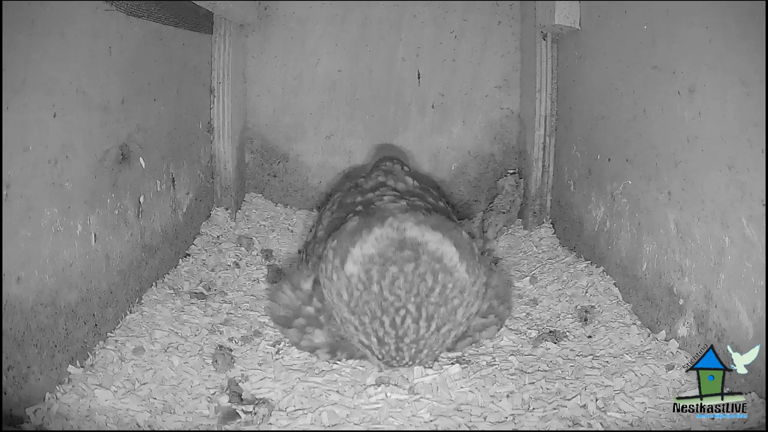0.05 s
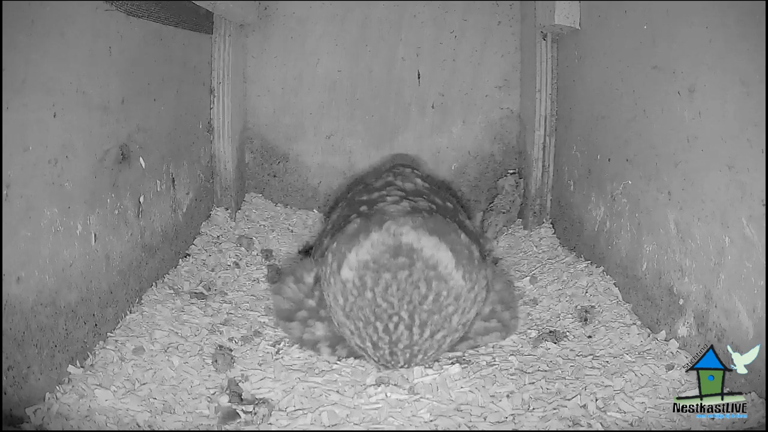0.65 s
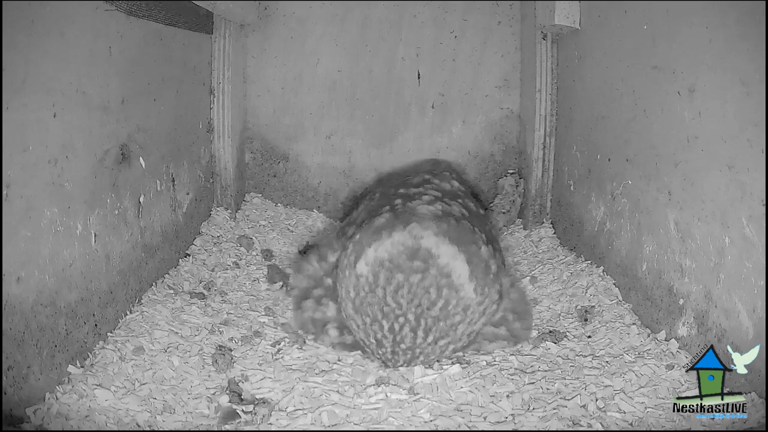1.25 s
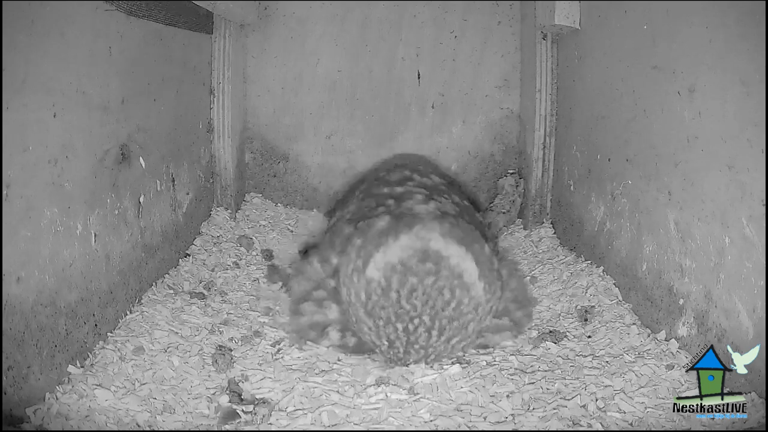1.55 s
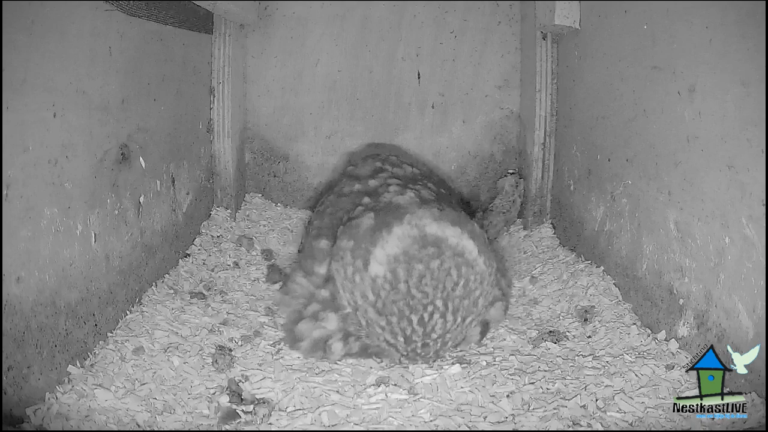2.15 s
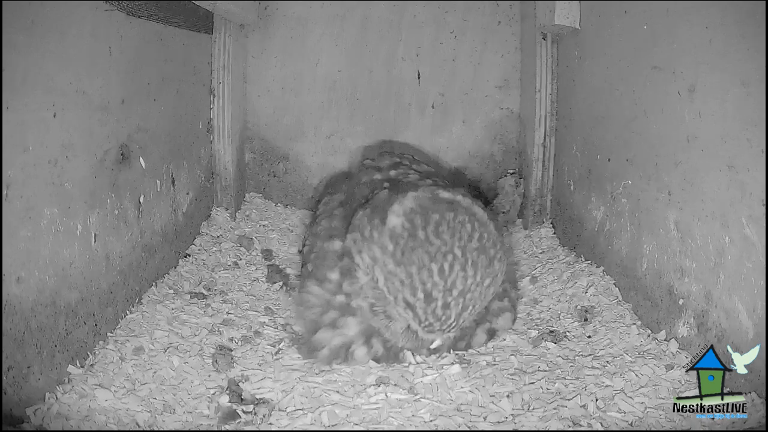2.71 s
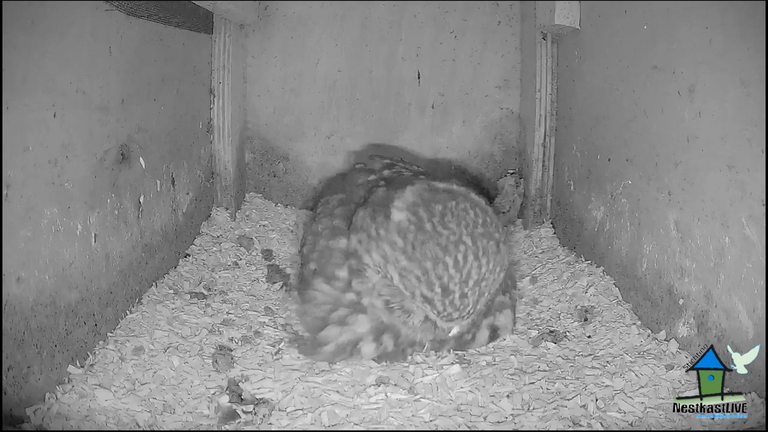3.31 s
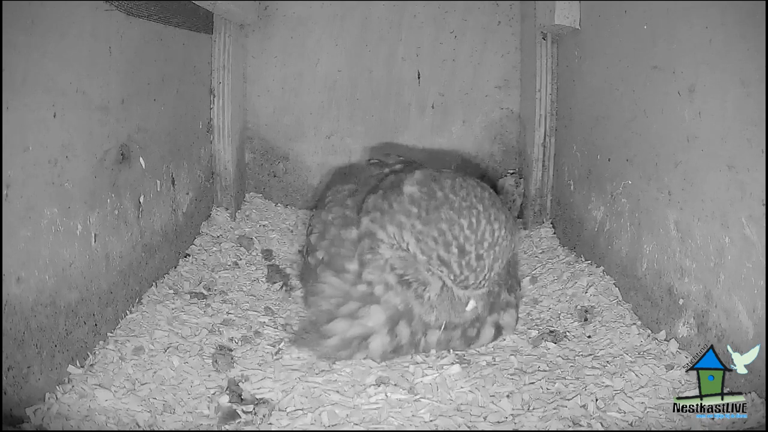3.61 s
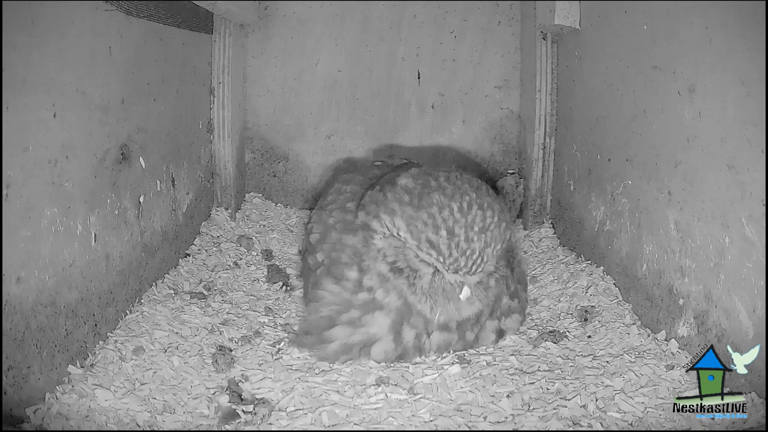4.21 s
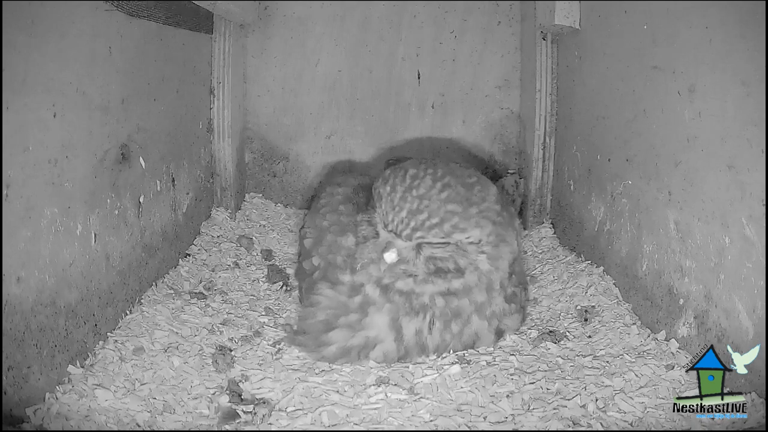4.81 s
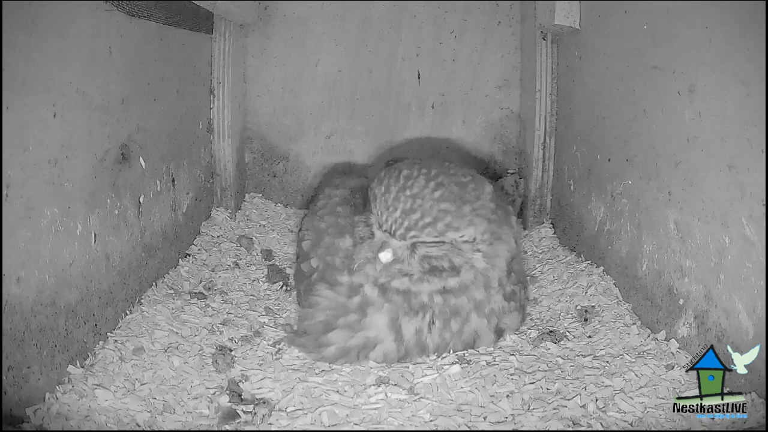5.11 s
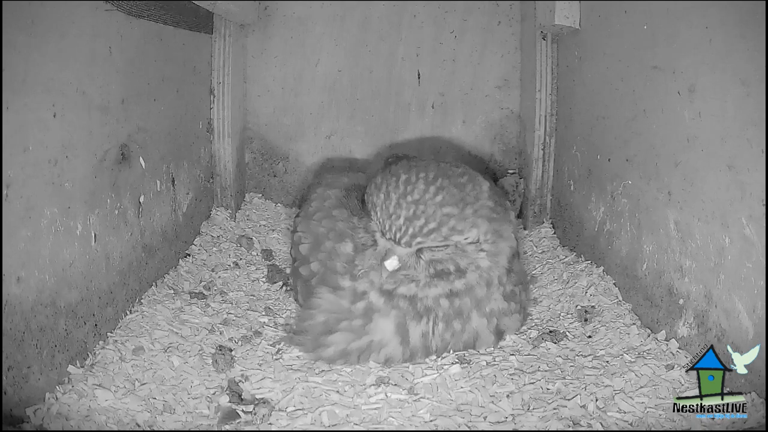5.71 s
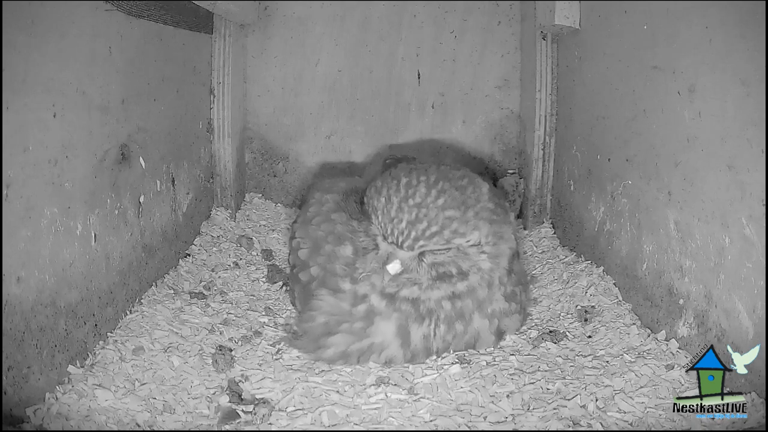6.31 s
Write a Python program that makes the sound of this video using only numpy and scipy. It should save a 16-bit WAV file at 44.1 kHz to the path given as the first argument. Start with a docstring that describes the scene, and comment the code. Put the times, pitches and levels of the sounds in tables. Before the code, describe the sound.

A deep, gently throbbing rumble fills a small wooden nest box throughout, with a thin hiss and the faint drone of far traffic. From the start until about 3 seconds, a small owl shuffles on wood shavings close to the microphone, in short bursts of dry rustling dotted with small snaps of chips under its claws. Soft, hollow footfalls ring the box, the strongest at about 1.4 seconds, with others near 1.7, 2.1 and 2.6. From about 3.3 seconds the owl preens quietly, with a few brief feathery scratches and ticks, a light knock near 3.7, and more faint strokes around 5.5. Small songbirds whistle faintly outside from about 3 seconds, thin sliding notes with a slight echo from the trees. They chirp more often between 4.4 and 5.2, give a quick trill from 5.3 to 5.8, and end with two longer notes near 6 seconds.

```python
"""You hear rustling, small snaps and soft thuds: a little owl shuffles on wood shavings in a wooden nest box,
pecks, then tucks its head in and preens. Slipping chips, claw snaps, footfalls and beak pecks all make the same
box ring. A low rumble fills it throughout, with a thin hiss and the drone of far traffic. In the second half,
small songbirds whistle faintly outside, echoed by the trees."""
import sys
import numpy as np
from scipy import signal
from scipy.fft import rfft, irfft
from scipy.io import wavfile
from scipy.ndimage import uniform_filter1d

SR = 44100
rng = np.random.default_rng(int(sys.argv[2]) if len(sys.argv) > 2 else 0)


def unload_audio(sound):
    """Save the sound as a 16-bit wav file, at the path given as the first command line argument."""
    columns = np.transpose(np.atleast_2d(sound))
    # keep every value between -1 and 1, then stretch to whole-number steps
    steps = np.round(np.clip(columns, -1, 1) * 32767)
    wavfile.write(sys.argv[1], SR, steps.astype(np.int16))


N = 280035
T = np.arange(N) / SR
HZ = np.arange(N // 2 + 1) * SR / N

# How strong the rumble and the hiss are from low to high: pitch_hz, relative_db
RUMBLE_SHAPE = [(15, 3), (30, -3.5), (50, -1.5), (80, 1), (100, -5.5), (122, -19.5), (160, -26),
                (215, -34.5), (300, -39.5), (360, -35.5), (435, -26), (490, -42), (900, -69.5)]
HISS_SHAPE = [(300, -25.5), (500, -3.5), (750, 4.5), (950, 0), (1250, 4.5), (1900, -7), (3100, -8.5),
              (4500, -12.5), (5900, -3.5), (6600, -16.5), (7400, -46.5)]
# The slow swell of the rumble: time_s, level_db
RUMBLE_SWELL = [(0, -39.5), (0.8, -38), (1.05, -43), (1.65, -36), (2.35, -40.5), (2.7, -38), (3.4, -41.5),
                (4.4, -38.5), (4.85, -38), (5.4, -40), (5.75, -38), (6.35, -43)]
# Tones that traffic rings in the box (wider ones die sooner): pitch_hz, width_hz, relative_db
TRAFFIC_TONES = [(270, 34, -1.5), (295.4, 21, 3.5), (333.3, 33, 1.5), (380, 60, 1), (444, 54, -8),
                 (695, 21, -27.5), (900, 13, -30.5)]
# Far vehicles passing: nearest_s, half_power_s (its sign does not matter), level_db
VEHICLES = [(0.101, -0.5, -61.5), (2.25, 0.32, -59.5), (5.02, 0.17, -56.5)]
# Single songbird notes: start_s, length_s, start_hz, end_hz, level_db, rasp (a share of the pitch)
BIRD_NOTES = [(3.113, 0.038, 7050, 7000, -81, 0.017), (3.17, 0.017, 5720, 5750, -62.5, 0.02),
              (3.237, 0.12, 6900, 7000, -82, 0.038), (3.365, 0.046, 5900, 5640, -71, 0.017),
              (3.443, 0.027, 5000, 4400, -73, 0.039), (3.519, 0.02, 4480, 4950, -68.5, 0.031),
              (4.353, 0.033, 3840, 3620, -71.5, 0.0094), (4.378, 0.025, 3485, 3220, -65.5, 0.018),
              (4.4, 0.023, 3240, 3080, -67, .02), (4.425, 0.028, 4440, 4200, -77, 0.017),
              (4.474, 0.042, 2690, 2270, -74.5, 0.032), (4.554, 0.055, 2420, 2380, -77.5, 0.035),
              (4.75, 0.033, 3480, 2810, -68.5, 0.034), (4.784, 0.016, 2440, 2370, -73, .02),
              (4.807, 0.04, 2710, 2200, -78, 0.052), (4.863, 0.032, 2430, 2280, -76, .02),
              (5.077, 0.014, 3510, 3200, -66.5, 0.02), (5.19, 0.023, 3650, 3470, -73.5, 0.016),
              (5.21, 0.021, 4260, 4400, -68, 0.023), (5.858, 0.12, 5000, 3890, -76, 0.047),
              (5.936, 0.12, 3470, 3390, -69, 0.021)]
# The two notes a trill repeats: delay_s, length_s, start_hz, end_hz, level_db, rasp
TRILL_NOTES = [(0, 0.022, 3500, 3340, -70, 0.037), (0.026, 0.027, 4290, 5040, -74, 0.063)]
# Tones of the box and the air in it: pitch_hz, width_hz, relative_db
BOX_TONES = [(139, 26, 4), (196, 36, 3.5), (309.4, 24, 6.5), (341.6, 38, -2), (440.6, 18, 4.5),
             (540, 67, -9.5), (708.3, 69.4, -2.5), (851.4, 39, -1.5), (1159, 49, -8.5), (1411, 70, -12),
             (1580, 130, -17.5), (1819, 98, -17.5), (2355, 240, -23), (2550, 95, -16.5), (2715, 190, -17.5),
             (3030, 91, -21.5), (3414, 240, -19.5), (3900, 170, -20.5), (4650, 240, -23.5),
             (5000, 340, -21), (5640, 170, -22), (6000, 170, -23), (6950, 83, -25)]
# Tones of the floor bending under the owl: pitch_hz, width_hz, relative_db
FLOOR_TONES = [(82, 29, 0.5), (132, 64, -14.5)]
# Thuds on the floor: the owl's weight landing, and at about 2.77, 2.83 and 3.67 s its beak pecking: start_s,
# peak_db, push_s
FLOOR_THUDS = [(1.371, -30, 0.0035), (1.397, -41, 0.0029), (1.717, -39, 0.0048), (2.053, -43, 0.0069),
               (2.587, -39.5, 0.0014), (2.771, -52, 0.00052), (2.826, -63.5, 0.003), (3.672, -43, 0.00096)]
# The owl shoves its body into the shavings: start_s, length_s, effort_db, claw_drag_db (added to effort)
BODY_SHOVES = [(0.038, 0.41, -60.5, -1), (0.547, 0.32, -61.5, 4.5), (0.984, 0.087, -62, 6.5),
               (1.156, 0.025, -62, 5.5), (1.276, 0.013, -62, 1), (1.366, 0.077, -61.5, 2.5),
               (1.51, 0.31, -60.5, 1.5), (1.88, 0.061, -58.5, 0.5), (2.022, 0.028, -59, 5.5),
               (2.138, 0.11, -60, 3), (2.402, 0.036, -68.5, 3), (2.734, 0.024, -64, -5),
               (2.998, 0.058, -72, 6)]
# The beak combs through the feathers: start_s, length_s, effort_db
BEAK_STROKES = [(3.352, 0.073, -69.5), (3.578, 0.018, -72.5), (3.888, 0.012, -69.5), (5.395, 0.0092, -68),
                (5.474, 0.023, -78), (5.568, 0.025, -86), (5.662, 0.012, -83)]
# The loudest chips giving way under claws and beak: time_s, knock_db, snap_db, pitch_hz, crush_s
CHIP_SNAPS = [(0.051, -50.5, -52.5, 1690, 0.0049), (0.061, -50, -55, 1490, 0.0025),
              (0.12, -58, -65, 2100, 0.0022), (0.136, -64, -54.5, 1460, 0.0056),
              (0.15, -52.5, -64, 1700, 0.0031), (0.194, -56, -58, 1880, 0.013),
              (0.231, -57, -69, 2200, 0.0029), (0.329, -50, -59.5, 2580, 0.0038),
              (0.358, -52, -57, 1450, 0.012), (0.398, -55, -59.5, 2470, 0.0034),
              (0.427, -61.5, -53, 2950, 0.0037), (0.558, -54, -61, 1440, 0.0046),
              (0.579, -53, -55.5, 2530, 0.0035), (0.601, -54.5, -59, 2710, 0.0024),
              (0.626, -66, -53, 1520, 0.0053), (0.661, -58, -60, 2300, 0.0072),
              (0.723, -67, -66.5, 6350, 0.0032), (0.756, -61, -65, 1800, 0.0044),
              (0.774, -50, -55.5, 2570, 0.006), (0.79, -52, -64, 2420, 0.0031),
              (0.814, -54, -49, 1730, 0.0044), (0.831, -55, -66, 1890, 0.0021),
              (0.853, -59, -64, 2600, 0.0033), (0.871, -60, -68, 6300, 0.003),
              (0.874, -52, -62, 2330, 0.0029), (0.948, -63.5, -61.5, 2130, 0.0072),
              (1.067, -54, -57, 2600, 0.0053), (1.079, -54, -59, 3550, 0.0069),
              (1.089, -51, -54, 1700, 0.0035), (1.141, -58, -58.5, 1670, 0.0013),
              (1.17, -65, -65.5, 2970, 0.0048), (1.291, -58, -63, 2370, 0.0083),
              (1.375, -48.5, -55.5, 2520, 0.0055), (1.383, -50, -70, 1800, 0.0047),
              (1.413, -48.5, -58, 3360, 0.0062), (1.431, -52.5, -57.5, 1610, 0.0028),
              (1.459, -74, -65.5, 6200, 0.0024), (1.483, -69, -61.5, 2860, 0.0025),
              (1.51, -57, -61.5, 2200, 0.0021), (1.539, -50.5, -57.5, 1890, 0.0033),
              (1.569, -49, -60, 2700, 0.005), (1.628, -61, -59.5, 2500, .004),
              (1.718, -54, -55, 2720, .003), (1.91, -62, -57.5, 2900, 0.01),
              (1.972, -46, -57, 2630, 0.0049), (2.048, -43.5, -51.5, 3380, 0.0077),
              (2.124, -60, -62, 3300, 0.0027), (2.242, -57, -59, 2900, 0.014),
              (2.406, -50, -56, 3200, 0.0013), (2.429, -58, -54, 2730, 0.0052),
              (2.529, -65, -61.5, 2600, 0.002), (2.539, -67, -50.5, 3900, 0.0024),
              (2.583, -42.5, -43.5, 2750, 0.0018), (2.73, -62, -61.5, 2800, 0.003),
              (2.767, -44.5, -55.5, 2830, 0.0048), (2.785, -59, -64, 2720, 0.0038),
              (2.824, -49, -61, 2740, 0.0036), (3.004, -58, -69, 1930, 0.003),
              (3.216, -70, -69.5, 2370, 0.003), (3.602, -57.5, -58, 2700, 0.003),
              (3.612, -68, -67, 2720, 0.002), (3.661, -73, -68, 2730, 0.0024),
              (3.674, -45.5, -56.5, 2770, 0.0045), (3.884, -60.5, -63, 2500, 0.0019),
              (3.896, -70, -57, 2600, 0.0023)]


def undb(db):
    """Turn decibels into a number to multiply by."""
    return 10 ** (np.asarray(db) / 20)


def unit(x):
    """Scale a sound to an average (rms) level of 1."""
    return x / np.sqrt(np.mean(x ** 2))


def at_level(x, db, size=192):
    """Scale a short sound so that its loudest moment has this rms level."""
    return x * undb(db) / np.sqrt(uniform_filter1d(x ** 2, size).max())


def add(out, start_s, x):
    """Mix a short sound in at a given time."""
    i = max(int(start_s * SR), 0)
    out[i:i + len(x)] += x[:N - i]


def wander(rate_hz):
    """A smooth random wobble of about 1 either way."""
    return unit(irfft(rfft(rng.standard_normal(N)) / (1 + (HZ / rate_hz) ** 4), N))


def noise(shape):
    """Noise whose strength from low to high follows a table."""
    hz, db = np.transpose(shape)
    gain = undb(np.interp(np.log(HZ + 1), np.log(hz), db))
    return unit(irfft(rfft(rng.standard_normal(N)) * gain, N))


def below(x, hz):
    """Keep the part of a sound below a pitch."""
    return signal.sosfilt(signal.butter(4, hz, "low", fs=SR, output="sos"), x)


def above(x, hz, order=4):
    """Keep the part of a sound above a pitch."""
    return signal.sosfilt(signal.butter(order, hz, "high", fs=SR, output="sos"), x)


def ring(push, tones):
    """A push sets off tones that die away; neighbouring tones swing in opposite directions."""
    t = T[:4096]
    response = sum((-1) ** k * undb(db) * width * np.exp(-np.pi * width * t) * np.sin(2 * np.pi * hz * t)
                   for k, (hz, width, db) in enumerate(tones))
    return signal.fftconvolve(push, response)[:len(push)]


def rumble_and_hiss():
    """A deep rumble swells and throbs unevenly under a thin, even hiss."""
    swell_db = np.interp(T, *np.transpose(RUMBLE_SWELL))
    throb_db = 1.7 * wander(rate_hz=9)
    return noise(RUMBLE_SHAPE) * undb(swell_db + throb_db) + noise(HISS_SHAPE) * undb(-75)


def traffic(steady_db=-74.5):
    """Far traffic drones in through the entrance hole and rings the box, louder as a vehicle passes."""
    passing = sum(undb(db) ** 2 / (1 + ((T - nearest_s) / half_power_s) ** 2)
                  for nearest_s, half_power_s, db in VEHICLES)
    drone = unit(ring(rng.standard_normal(N), TRAFFIC_TONES))
    return drone * np.sqrt(undb(steady_db) ** 2 + passing)


def trill(first_s=5.323, period_s=0.063, count=15, fade_db=3):
    """List two notes that take turns and fade, each a little off in time, pitch and strength."""
    notes = []
    for k in range(count):
        cycle, which = divmod(k, len(TRILL_NOTES))
        delay_s, length_s, start_hz, end_hz, db, rasp = TRILL_NOTES[which]
        slip, bend, force = rng.standard_normal(size=3)
        start_s = first_s + cycle * period_s + delay_s + 0.003 * slip
        tuning = 1 + 0.015 * bend
        level_db = db + 1.5 * force - fade_db * k / count
        notes.append((start_s, length_s, start_hz * tuning, end_hz * tuning, level_db, rasp))
    return notes


def songbirds(echo_share=0.79, echo_decay_s=0.04):
    """Sliding whistles, some pure and some raspy, smeared by the trees between the birds and the box."""
    song = np.zeros(N)
    waver = wander(rate_hz=300)
    for start_s, length_s, start_hz, end_hz, db, rasp in BIRD_NOTES + trill():
        progress = np.linspace(0, 1, int(length_s * SR))
        slide_hz = start_hz * (end_hz / start_hz) ** progress
        hz = slide_hz * (1 + rasp * waver[int(start_s * SR):][:len(progress)])
        whistle = np.sin(2 * np.pi * np.cumsum(hz) / SR)
        add(song, start_s, undb(db) * np.sin(np.pi * progress) * whistle)
    t = T[:SR // 2]
    trees = rng.standard_normal(len(t)) * np.exp(-t / echo_decay_s)
    return song + echo_share * signal.fftconvolve(song, trees / np.linalg.norm(trees))[:N]


def floor_thuds():
    """A foot or the beak pushes on the floor, and the box answers with a thud."""
    out = np.zeros(N)
    for start_s, peak_db, push_s in FLOOR_THUDS:
        push = np.sin(np.pi * np.minimum(T[:4096] / push_s, 1)) ** 2
        thud = ring(push, BOX_TONES)
        add(out, start_s, undb(peak_db) * thud / np.abs(thud).max())
    return out


def slipping_chips(per_s, spread_db, low_hz, high_hz, cycles, size=192):
    """Shavings slip at random moments, each ringing briefly at its own pitch: many weak, a few strong."""
    when, pitch, force, sign = rng.random((int(per_s * N / SR), 4)).T
    hz = low_hz * (high_hz / low_hz) ** pitch
    strength_db = spread_db * np.minimum(-np.log(1 - force), 4)
    gain = np.sign(sign - 0.5) * undb(strength_db) * np.sqrt(hz / low_hz)
    turns = hz[:, None] * T[:size]
    ticks = gain[:, None] * np.exp(-turns / cycles) * np.sin(2 * np.pi * turns)
    places = (when * N).astype(int)[:, None] + np.arange(size)
    return unit(np.bincount(places.ravel(), ticks.ravel(), N)[:N])


def movement(start_s, length_s, effort_db, rise_s, fade_s):
    """The effort of one movement: it rises, holds and dies away."""
    rise = np.clip((T - start_s) / rise_s, 0, 1)
    return undb(effort_db) * rise * np.exp(-np.maximum(T - start_s - length_s, 0) / fade_s)


def rustle(resting_db=-76):
    """Shoves bend the floor. As the owl moves, thick chips knock; thin edges and feathers crackle."""
    shoves = [movement(*row[:3], rise_s=0.009, fade_s=0.083) for row in BODY_SHOVES]
    shove = np.max(shoves, axis=0) + undb(resting_db)  # the shavings never lie quite still
    drag = np.max([effort * undb(row[3]) for effort, row in zip(shoves, BODY_SHOVES)], axis=0)
    preen = sum(movement(*row, rise_s=0.0059, fade_s=0.019) for row in BEAK_STROKES)
    nudge = undb(3.5) * preen  # the duller part of preening
    # All chips swell together, and each kind of sound also flickers on its own.
    shared_swell = undb(1.1 * wander(rate_hz=40))
    dull_flicker, scrape_flicker, crisp_flicker = (undb(1.6 * wander(rate_hz=45)) for _ in range(3))
    thick = slipping_chips(per_s=1500, spread_db=2.8, low_hz=251, high_hz=2200, cycles=1.5)
    thin = slipping_chips(per_s=2200, spread_db=3.0, low_hz=1906, high_hz=7300, cycles=4)
    thick_in_box = below(ring(thick, BOX_TONES), hz=1800)
    thin_in_box = above(ring(thin, BOX_TONES), hz=1880)
    dull = unit(below(thick_in_box, hz=1160))
    # Scrapes and crackles are heard partly through the box and partly directly.
    scrape = unit(above(thick_in_box, hz=1160)) + undb(-6.5) * unit(above(thick, hz=1140))
    crisp = unit(thin_in_box) + undb(-2.5) * thin
    dull *= dull_flicker * (shove + nudge)
    scrape *= undb(-7) * scrape_flicker * (drag + nudge)
    crisp *= undb(-5) * crisp_flicker * (undb(-6) * shove + preen)
    floor = undb(8.5) * shove * unit(ring(rng.standard_normal(N), FLOOR_TONES))
    return floor + shared_swell * (dull + scrape + crisp)


def snapping_chips(size=2048, lead_s=0.01):
    """A sudden crack trails off in splinters; the chip rings briefly at its own pitch and the box knocks."""
    out = np.zeros(N)
    t = T[:size] - lead_s
    crack = signal.unit_impulse(size, int(lead_s * SR))
    for time_s, knock_db, snap_db, pitch_hz, crush_s in CHIP_SNAPS:
        spread_s = crush_s * np.where(t < 0, 0.5, 1)  # splinters build up twice as fast as they fade
        splinters = rng.standard_normal(size) * np.exp(-np.abs(t) / spread_s)
        knock = ring(crack + 0.094 * splinters, BOX_TONES)
        knock = above(below(knock, hz=1180), hz=419)
        push = crack + 0.25 * splinters
        chip = unit(ring(push, [(pitch_hz, 0.4 * pitch_hz, 0)]))
        chip_in_box = unit(ring(unit(push) + undb(6.5) * chip, BOX_TONES))
        snap = above(chip_in_box + undb(-18) * chip, hz=0.75 * pitch_hz)
        # The crack's sharp edge is heard directly; smaller, higher chips crack brighter.
        edge = below(above(push, hz=1.08 * pitch_hz), hz=6150)
        edge_db = snap_db - 8.5 + 3.5 * np.log2(pitch_hz / 5100)
        sound = at_level(knock, knock_db) + at_level(snap, snap_db) + at_level(edge, edge_db)
        add(out, time_s - lead_s, sound)
    return out


def scene():
    """Mix the owl, the songbirds and the background into one channel."""
    owl = rustle() + snapping_chips() + floor_thuds()
    return (owl + songbirds() + traffic() + rumble_and_hiss())[None]


def record(dry, bottom_hz=12, top_hz=7300):
    """A small microphone loses the deepest and highest sounds; both ends fade quickly."""
    fade = np.clip(np.minimum(T, T[-1] - T) / 0.008, 0, 1)
    trimmed = above(dry * fade, bottom_hz, order=2)
    return signal.sosfilt(signal.ellip(10, 0.2, 70, top_hz, fs=SR, output="sos"), trimmed)


dry = scene()
out = record(dry)
unload_audio(out)
```